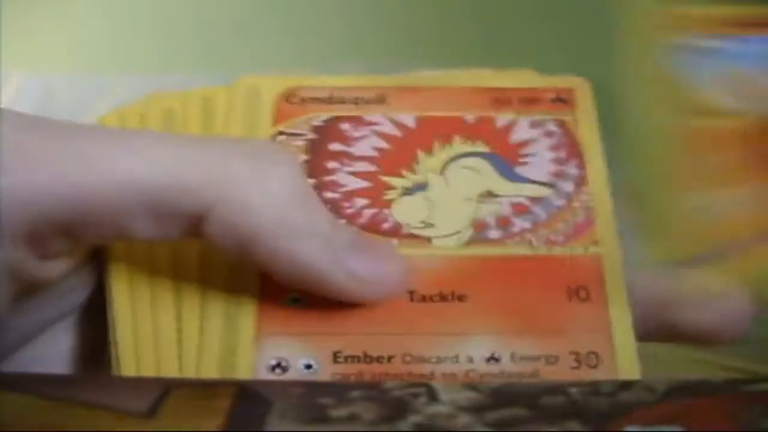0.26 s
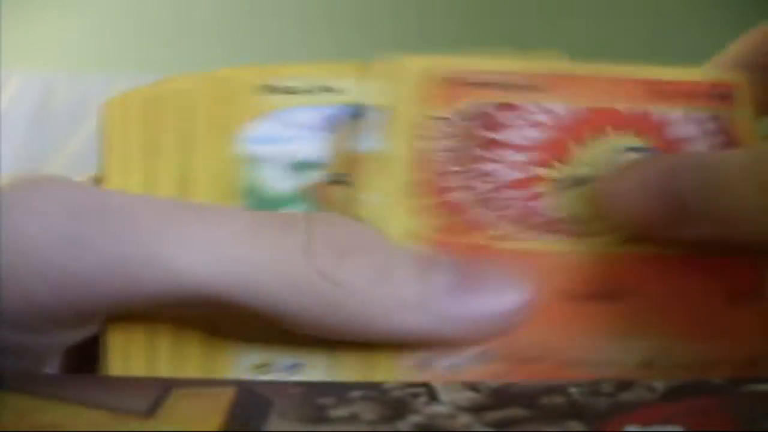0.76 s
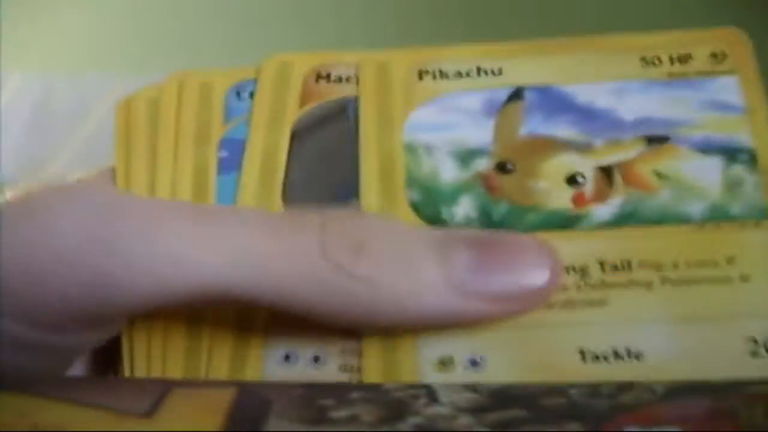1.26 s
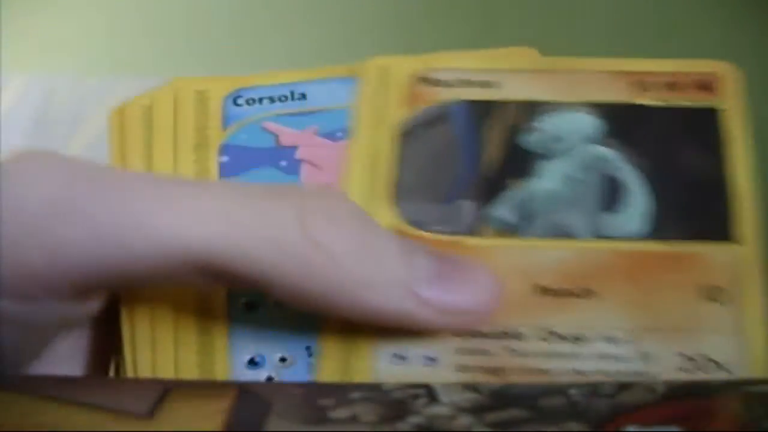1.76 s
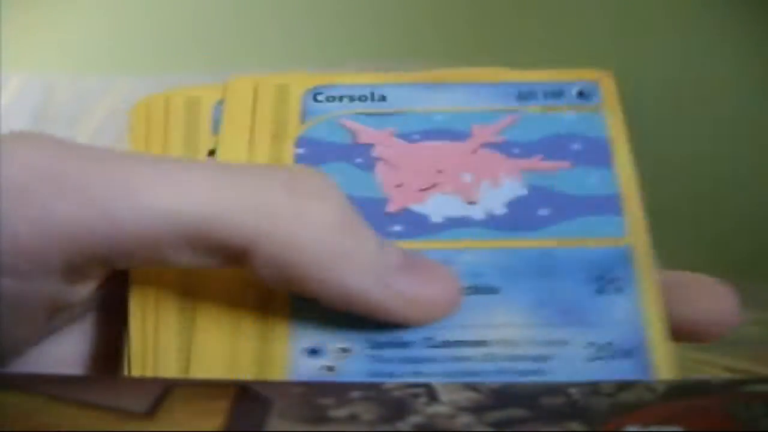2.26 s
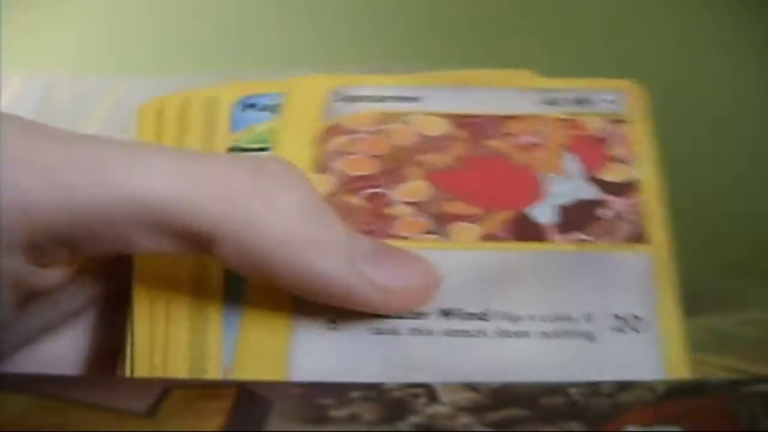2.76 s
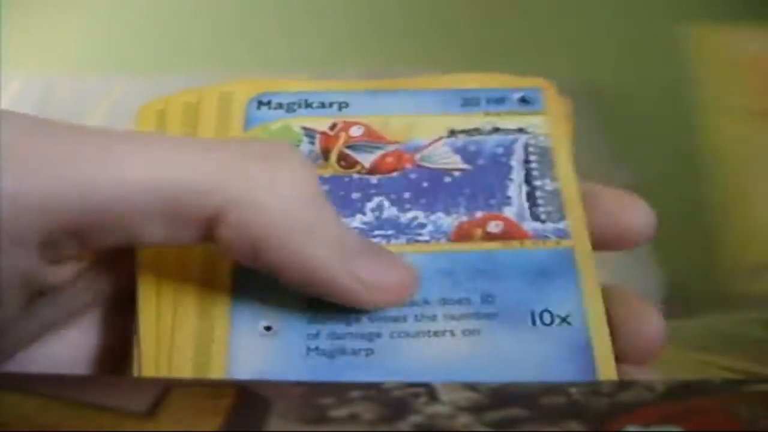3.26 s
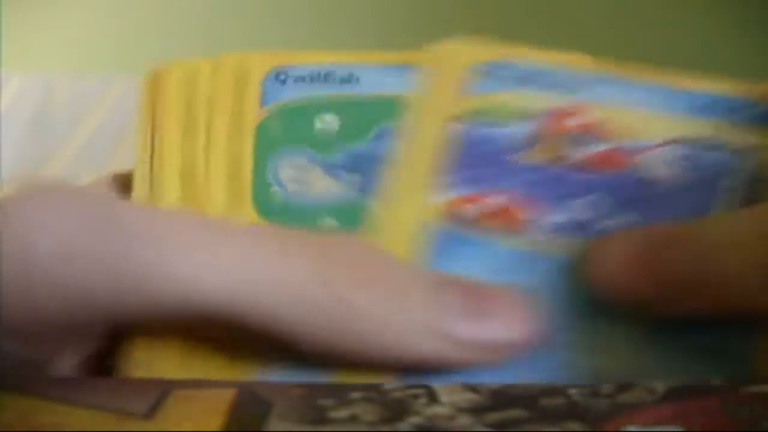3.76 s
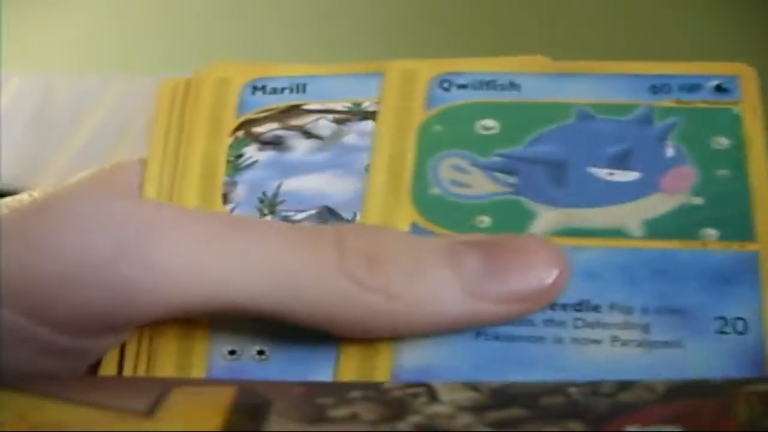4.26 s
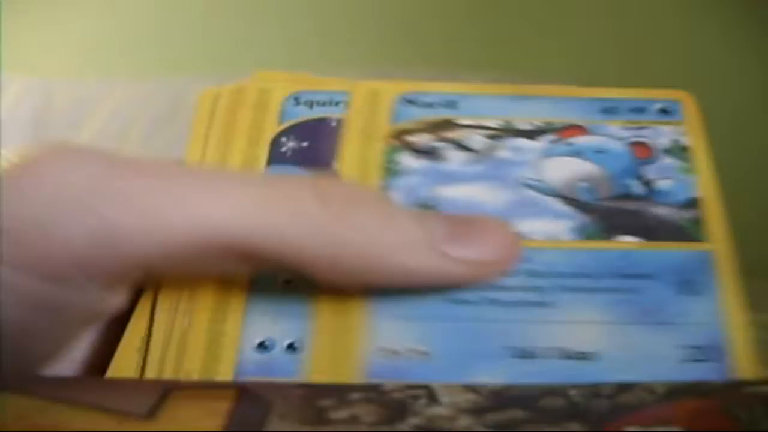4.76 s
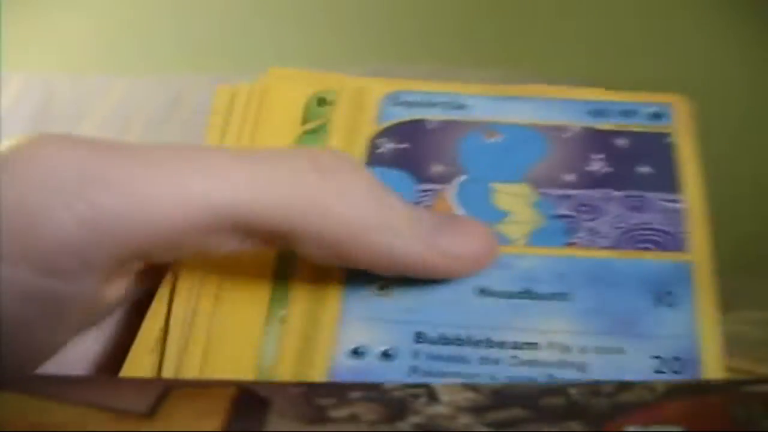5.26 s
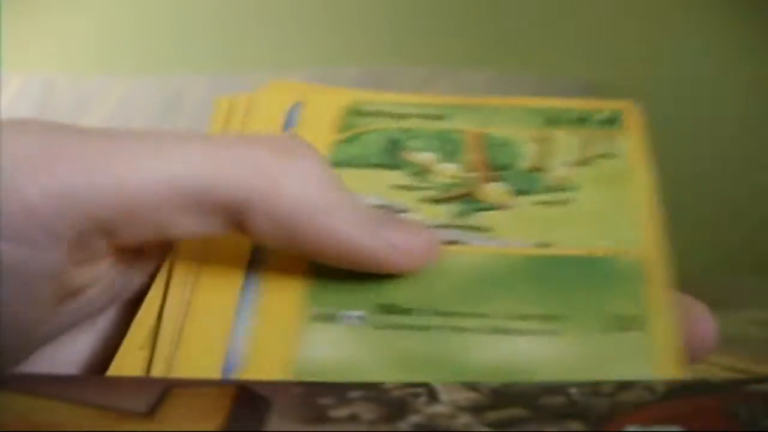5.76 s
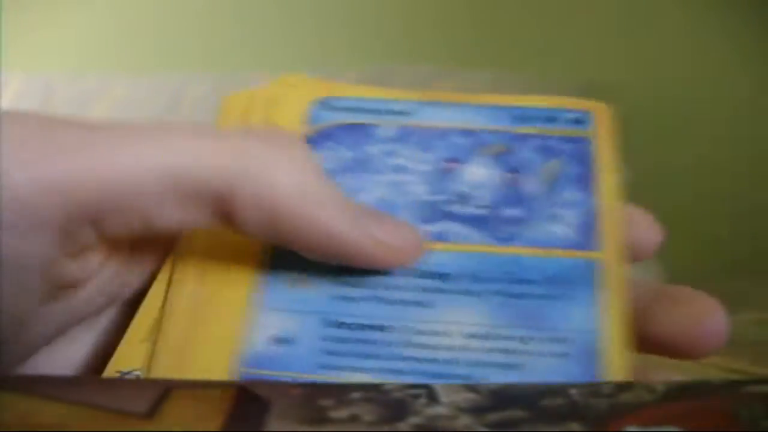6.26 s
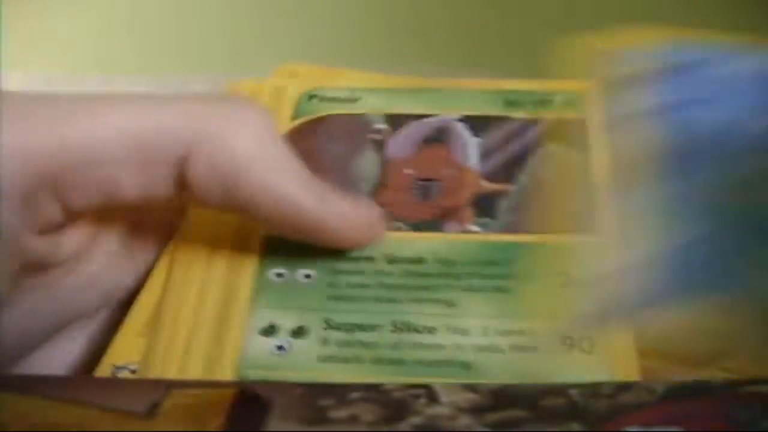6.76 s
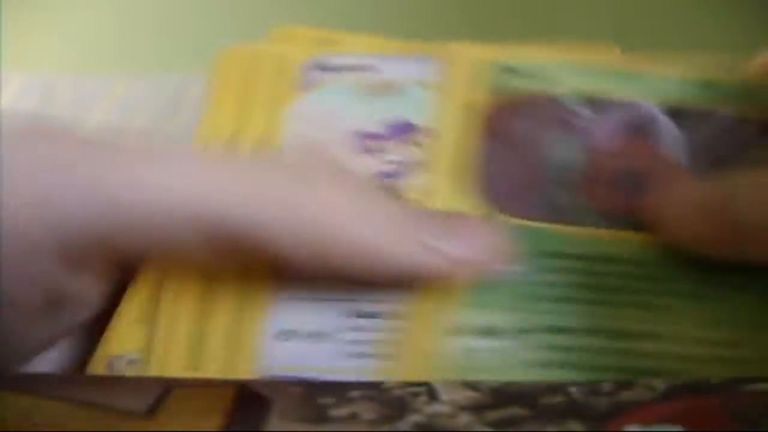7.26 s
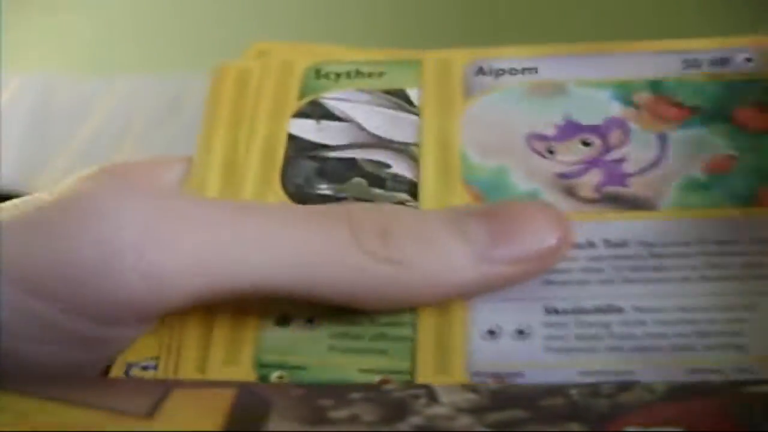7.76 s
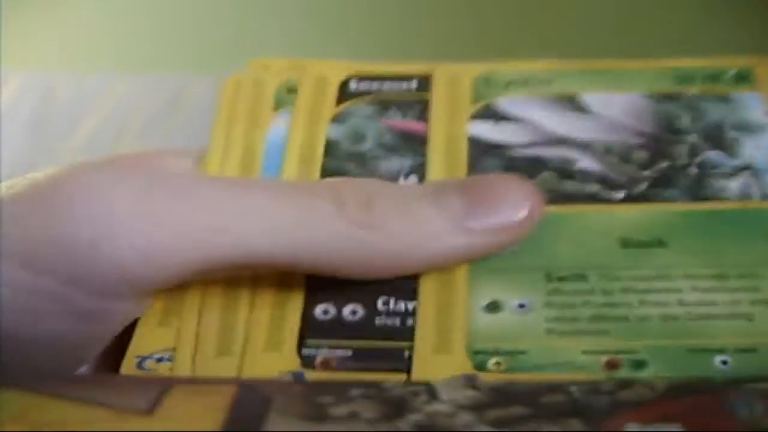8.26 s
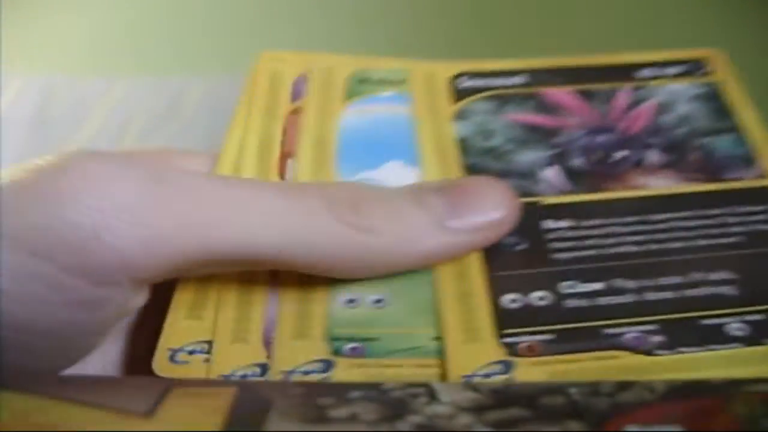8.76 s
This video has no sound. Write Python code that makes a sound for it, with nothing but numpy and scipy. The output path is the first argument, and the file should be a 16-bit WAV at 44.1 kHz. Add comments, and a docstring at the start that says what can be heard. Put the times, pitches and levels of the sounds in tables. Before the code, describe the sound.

A constant soft hiss with a faint, fast electrical throb starts at once and stays beneath everything. From about 0.2 s a stack of stiff coated cards is leafed through by hand, close to a small microphone in a quiet small room. Roughly every 0.6 s the same cycle repeats: a light finger tick, a papery swish gathering speed, a crisp flick as the edge comes free about 0.1 s later, then a snap and short dry scrape as the card slides behind the stack. Small stutters, snags and soft hollow brushes vary each one. Early cards are fairly light; around 3.9-4.1 s a cluster of snags ends in the hardest clack, with a brief ring of the stack. Another firm knock follows at 4.7 s and a strong one at 5.3 s. Lighter flips continue from 5.6 s, with a double tuck near 8.6 s and a last grip and pull beginning around 9 s.

```python
"""A steady hiss with a faint electrical throb opens the scene; then a stack of cards is leafed through by hand,
close to a small camera in a quiet room. Each card ticks when gripped, swishes as it is drawn off, flicks free
and is tucked in behind the stack with a snap and a scrape. Friction is noise with a moving level, snaps are
impulses with a short ring, brushes are resonant noise swells and knocks are sums of decaying modes.
Filtered noise makes the hiss, and a train of small voltage dips makes the throb."""
import sys
import numpy as np
from scipy import signal
from scipy.fft import rfft, irfft
from scipy.io import wavfile

SR = 44100
rng = np.random.default_rng(int(sys.argv[2]) if len(sys.argv) > 2 else 0)


def inscribe(sig):
    """Save sig as 16-bit PCM at rate SR to the path in sys.argv[1].

    A 1-D sig is mono; a 2-D sig holds one channel per row.
    Samples are clipped to [-1, 1] before scaling.
    """
    pcm = np.round(np.clip(np.atleast_2d(sig).T, -1, 1) * 32767)
    wavfile.write(sys.argv[1], SR, pcm.astype(np.int16))


N = 397341  # length [samples]

# Card levels in the tables and settings apply before the layer gains in scene() and the shared resonances.

# Spectrum of the microphone's hiss: (frequency [Hz], relative density [dB])
HISS_SPECTRUM = [(20, 9), (120, 5), (300, 0.5), (750, 1.5), (1500, -0.5), (3800, 0.5), (5500, -2),
                 (7000, -4), (8500, -9.5), (9700, -17), (11000, -37)]
# Resonances of the cavity before the microphone: (frequency [Hz], width [Hz], lift [dB])
CAVITY_RESONANCES = [(2425, 31, 4.5), (8530, 143, 8.5)]
# Spectrum of coated-card friction: (frequency [Hz], relative density [dB])
FRICTION_SPECTRUM = [(900, -54), (1750, -9.5), (2300, 1.5), (3400, 2), (4600, 0), (6000, -2.5),
                     (7500, -3.5), (8600, -11.5), (9400, -16), (11000, -35)]
# Spectrum of a card edge cracking: (frequency [Hz], relative density [dB])
CRACK_SPECTRUM = [(60, -63), (300, -17.5), (1100, -26.5), (1700, -6), (2400, 2), (3500, 2), (4500, 3.5),
                  (6000, 0.5), (7500, -4), (8600, -12), (9400, -8.5), (11000, -25.5)]
# Broad response of a card held in the fingers: (frequency [Hz], relative density [dB])
BODY_SPECTRUM = [(40, -45), (150, -7.5), (350, -4), (700, -0.5), (1000, -0.5), (1600, -8.5), (2200, -13),
                 (4000, -38.5)]
# A card brushes along the fingers:
# (loudest time [s], friction hiss [dB], ring [dB], resonance [Hz], half length of ring swell [s])
BRUSHES = [(0.352, -54, -53.5, 1520, 0.0063), (0.964, -52, -53.5, 1120, 0.0044),
           (1.503, -60, -43, 780, 0.0024), (2.213, -53.5, -44.5, 1060, 0.0032),
           (3.374, -62, -68, 1200, 0.004), (4.002, -51.5, -60, 1420, 0.012),
           (4.612, -47, -47, 1190, 0.0031), (5.187, -55.5, -58.5, 890, 0.014),
           (6.341, -60.5, -55, 865, 0.003), (6.838, -50.5, -53.5, 816, 0.0033),
           (7.454, -65, -67, 1040, 0.008), (8.536, -67, -52, 2080, 0.0024), (8.636, -51, -41, 684, 0.0037),
           (8.898, -62.5, -69, 430, 0.013)]
# A card knocks hard against the stack: (time [s], level over 1 ms [dB])
KNOCKS = [(3.898, -33), (4.091, -21.5), (4.100, -26), (4.675, -33), (5.270, -21), (5.281, -23),
          (8.669, -34)]
# Ring of the stack in the cupped hand: (frequency [Hz], relative level [dB], 60 dB decay time [s])
STACK_MODES = [(384, -32, 0.19), (700, -19, 0.04), (904, -5, 0.03), (2507, 4.5, 0.028), (2830, -6, 0.058),
               (3420, -6, 0.061), (8170, -5.5, 0.034)]
# A finger lands on the top card: (time [s], edge crack over 1 ms [dB], card flex over 1 ms [dB])
GRIPS = [(0.172, -41.5, -47), (0.757, -35.5, -36), (1.373, -50, -46.5), (1.995, -53, -47.5),
         (2.550, -46, -41.5), (3.149, -48, -40.5), (3.736, -35.5, -42), (4.389, -48.5, -42),
         (4.984, -42.5, -45.5), (5.576, -48, -47), (6.091, -57, -53.5), (6.682, -50, -49.5),
         (7.256, -40.5, -46), (7.835, -43.5, -41), (8.415, -47.5, -47), (8.963, -46, -53)]
# A card comes unstuck and gathers speed: (start time [s], swell length [s], unstick crack over 1 ms [dB],
# swish at start [dB], swish at fastest [dB], card resonance [Hz])
PULLS = [(0.181, 0.06, -51, -58, -54.5, 1220), (0.776, 0.097, -42.5, -60, -47.5, 990),
         (1.403, 0.067, -45, -72, -49, 836), (2.014, 0.068, -46.5, -66, -50, 1150),
         (2.580, 0.100, -42.5, -61, -48.5, 1080), (3.154, 0.064, -43.5, -70.5, -51.5, 810),
         (3.749, 0.12, -38.5, -64.5, -50.5, 795), (4.398, 0.096, -51, -65, -51.5, 700),
         (4.995, 0.099, -45, -57, -48, 940), (5.595, 0.086, -47, -64, -55.5, 810),
         (6.112, 0.089, -41, -65, -52, 810), (6.698, 0.090, -46.5, -64, -48.5, 1060),
         (7.263, 0.088, -41.5, -60.5, -49, 895), (7.856, 0.096, -40, -61, -50, 705),
         (8.431, 0.084, -65, -64, -47.5, 755), (8.969, 0.045, -55, -68, -54.5, 980)]
# The far edge flicks free of the thumb:
# (time [s], edge crack over 1 ms [dB], card flex over 1 ms [dB], flex frequency [Hz])
FLICKS = [(0.267, -30.5, -43.5, 1240), (0.870, -37.5, -34.5, 1040), (1.502, -43.5, -34, 810),
          (2.105, -48, -46, 970), (2.685, -48, -43.5, 1060), (3.234, -46, -43, 810),
          (3.879, -33.5, -34.5, 825), (4.492, -40.5, -36, 640), (5.103, -30, -40.5, 1550),
          (5.683, -40, -34.5, 540), (6.227, -39, -36, 890), (6.807, -42, -43, 1280),
          (7.353, -39.5, -38, 580), (7.939, -37, -50, 840), (8.526, -37, -49, 1640)]
# A card snags on a neighbour's edge and slips free:
# (time [s], edge crack over 1 ms [dB], card flex over 1 ms [dB], flex frequency [Hz])
SNAGS = [(0.445, -32.5, -40, 1570), (1.047, -44, -33, 860), (1.067, -39.5, -39, 740),
         (2.088, -46, -44, 1110), (2.26, -42, -42, 840), (2.834, -58, -34.5, 960),
         (3.25, -40.5, -48.5, 1560), (3.416, -38, -35.5, 1450), (3.439, -38, -36, 1010),
         (3.858, -39.5, -51, 830), (3.887, -29, -36.5, 1410), (3.898, -28.5, -43, 850),
         (4.054, -39.5, -34, 1190), (4.065, -43, -46, 810), (4.091, -29, -27, 830), (4.1, -25.5, -45, 417),
         (4.119, -35, -35, 825), (4.676, -46, -31.5, 1590), (4.684, -33, -34, 970),
         (5.094, -38.5, -47.5, 960), (5.271, -24, -23, 700), (5.28, -35, -33.5, 1540),
         (5.698, -40.5, -45.5, 820), (5.818, -41.5, -40, 785), (5.854, -46, -48, 745),
         (6.207, -57, -41, 710), (6.401, -44, -42.5, 640), (7.534, -43, -35, 740), (8.094, -35, -33, 1580),
         (8.622, -37, -43, 1250), (8.681, -41, -40.5, 1610)]
# A card meets the back of the stack and scrapes home: (contact time [s], swell length [s],
# crack over 1 ms [dB], flex over 1 ms [dB], scrape at fastest [dB], 60 dB fade time [s],
# card body against hiss [dB], card resonance [Hz])
TUCKS = [(0.438, 0.018, -39.5, -42.5, -47.5, 0.16, -6.5, 865),
         (1.039, 0.033, -39, -36.5, -48.5, 0.14, -6, 790), (1.668, 0.018, -37, -34.5, -48.5, 0.17, -8, 600),
         (2.243, 0.034, -43, -65, -51, 0.16, -7.5, 885), (2.828, 0.013, -40, -38, -51.5, 0.15, -8, 1490),
         (3.402, 0.034, -36, -62, -51, 0.25, -5.5, 865), (4.087, 0.017, -24, -28, -33, 0.15, -15, 690),
         (4.672, 0.022, -36, -38, -43, 0.14, -12, 700), (5.225, 0.04, -35.5, -36.5, -45, 0.22, -6.5, 1220),
         (5.268, 0.003, -30, -26, -32, 0.16, -9, 517), (5.806, 0.021, -37, -43, -51, 0.18, -8.5, 765),
         (6.36, 0.044, -39.5, -39, -53.5, 0.2, -7.5, 950),
         (6.943, 0.024, -42, -38.5, -48.5, 0.14, -7, 1600), (7.524, 0.026, -58, -55, -45.5, 0.17, -10, 785),
         (8.075, 0.027, -37, -35.5, -43, 0.16, -8.5, 1090), (8.604, 0.03, -43, -44, -47, 0.12, -4, 724),
         (8.668, 0.011, -33.5, -35.5, -45.5, 0.16, -19, 600)]

# Background; the throb's width is the 1/e half-width of one dip
HISS_DB = -66.5
FRAME_HZ = 30
THROB_DB, THROB_WIDTH_S, THROB_DELAY_S = -63, 0.0022, 0.00072
ROOM_T60_S, ROOM_DB = 0.13, -16.5
CUTOFF_HZ = 10900
# Friction strokes: swell rise, fade and body level against hiss
PULL_FADE_T60_S, PULL_BODY_DB = 0.14, -15.5
TUCK_SWELL_DB = 10
BRUSH_SWELL_S, BRUSH_SWELL_DB, BRUSH_FADE_T60_S, BRUSH_BODY_DB = 0.031, 18.5, 0.11, -13
# Just before it meets the stack a card slides over the fingers; level is against its scrape
APPROACH_S, APPROACH_DB, APPROACH_SWELL_DB, APPROACH_FADE_T60_S = 0.016, -17.5, 7.5, 0.045
# Edge snaps; the unstick flex is against its crack
GRIP_FLEX_HZ, GRIP_FLEX_T60_S, UNSTICK_FLEX_DB = 650, 0.015, -4
FLICK_FLEX_T60_S, SNAG_FLEX_T60_S, TUCK_FLEX_T60_S = 0.02, 0.016, 0.028
# A sliding edge stutters at chance moments; cracks are against the friction hiss, flex against the crack
STUTTERS_PER_PULL, STUTTERS_PER_TUCK = 4, 2
PULL_STUTTER_DB, TUCK_STUTTER_DB, STUTTER_FLEX_DB, STUTTER_SPREAD_DB = 2.5, 1.5, -4.5, 3.5
STUTTER_FLEX_T60_S, STUTTER_SPREAD_OCTAVES, STUTTER_OVERRUN_S = 0.014, 0.28, 0.014


def from_db(db):
    """Logarithmic level: 20 dB is a factor of ten in amplitude."""
    return 10 ** (np.asarray(db) / 20)


def rms_one(x):
    """Mean power: scale a sound to rms 1."""
    return x / np.sqrt(np.mean(x ** 2) + 1e-20)


def unit_pulse(x):
    """Pulse energy: scale to that of one millisecond at rms 1."""
    return x * np.sqrt(SR / 1000 / (np.sum(x ** 2) + 1e-20))


def colour(x, spectrum, ripple_db=0.0, size=2048):
    """Minimum-phase filtering: a causal spectrum; ripple adds chance resonances, as each grip bends a card."""
    hz = np.maximum(np.arange(size // 2 + 1) * SR / size, 1)
    points, levels = np.transpose(spectrum)
    bump_places = np.linspace(0, np.sqrt(hz[-1]), num=75)
    bumps = np.interp(np.sqrt(hz), bump_places, rng.standard_normal(size=75))
    response_db = np.interp(np.log(hz), np.log(points), levels) + ripple_db * bumps
    # folding the cepstrum onto positive time makes the filter causal
    cepstrum = irfft(np.log(from_db(response_db)))
    cepstrum[1:size // 2] *= 2
    cepstrum[size // 2 + 1:] = 0
    impulse_response = irfft(np.exp(rfft(cepstrum)))
    return signal.fftconvolve(x, impulse_response)[:len(x)]


def resonate(x, hz, width_hz):
    """Simple resonance: a damped pole pair with gain 1 at its peak."""
    r = np.exp(-np.pi * width_hz / SR)
    feedforward = np.array([1, 0, -1]) * (1 - r * r) / 2
    feedback = [1, -2 * r * np.cos(2 * np.pi * hz / SR), r * r]
    return signal.lfilter(feedforward, feedback, x)


def add(out, s, sound):
    """Superposition: mix a sound in at a time in seconds."""
    at = max(round(s * SR), 0)
    out[at:at + len(sound)] += sound[:max(N - at, 0)]


def grains(count, per_s, spread_db):
    """Stick-slip of paper fibres: random clicks of uneven size, scaled to rms 1."""
    sizes = from_db(spread_db * np.minimum(rng.exponential(1, count), 3.5))
    occurs = rng.random(count) < per_s / SR
    return rms_one(occurs * sizes * rng.choice([-1, 1], count))


def camera_noise(uneven_db=3.0):
    """Electrical noise: microphone hiss, and a small dip of the supply at each frame readout."""
    frames = (np.arange(N) / SR - THROB_DELAY_S) * FRAME_HZ + .5
    frame_depths = from_db(THROB_DB + uneven_db * rng.standard_normal(int(frames[-1]) + 2))
    depth = frame_depths[frames.astype(int)]
    from_centre_s = (frames % 1 - .5) / FRAME_HZ
    dips = depth * np.exp(-(from_centre_s / THROB_WIDTH_S) ** 2)
    hiss = from_db(HISS_DB) * rms_one(colour(rng.standard_normal(N), HISS_SPECTRUM))
    return hiss + dips.mean() - dips


def room(x, first_echo_s=0.0013, wall_cut_hz=7000, size=16384):
    """Reverberation: a small furnished room returns a short, slightly dull, exponentially decaying tail."""
    t = np.arange(size) / SR
    decay = np.exp(-np.log(1000) * t / ROOM_T60_S)
    tail = rng.standard_normal(size) * decay * (t > first_echo_s)
    tail = signal.sosfilt(signal.butter(1, wall_cut_hz, fs=SR, output="sos"), tail)
    return signal.fftconvolve(x, tail / np.sqrt(np.sum(tail ** 2)))[:N]


def knocks(spread_db=0.5, size=6000):
    """Modal superposition: a hard knock rings the whole stack, each mode with a strength of its own."""
    out, t = np.zeros(N), np.arange(size) / SR
    hz, mode_db, t60 = np.transpose(STACK_MODES)[:, :, None]
    for s, level_db in KNOCKS:
        strength = from_db(mode_db + spread_db * rng.standard_normal(hz.shape))
        strength = strength * rng.choice([-1, 1], hz.shape)
        modes = strength * np.sin(2 * np.pi * hz * t) * np.exp(-np.log(1000) * t / t60)
        add(out, s, from_db(level_db) * unit_pulse(modes.sum(axis=0)))
    return out


def brushes(width_hz=450, size=4096):
    """Resonant noise: a soft graze has no crack; it swells and fades in one resonance of the card."""
    out, t = np.zeros(N), (np.arange(size) - size // 2) / SR
    for s, _, level_db, hz, half_length in BRUSHES:
        swell = 1 / (1 + (t / half_length) ** 2)
        rub = resonate(rng.standard_normal(size), hz, width_hz)
        rub = swell * resonate(rub, hz, width_hz)
        add(out, s + t[0], from_db(level_db) * rms_one(rub) * np.sqrt(np.mean(swell ** 2)))
    return out


def strokes():
    """Kinematics of sliding: pulls, tucks and light grazes, each stroke rising to its fastest moment."""
    # rows: (start [s], fastest [s], hiss at start [dB], at fastest [dB], fade t60 [s], body [dB], resonance [Hz])
    pulls, tucks, grazes = [], [], []
    for s, swell, _, start_db, top_db, hz in PULLS:
        pulls.append((s, s + swell, start_db, top_db, PULL_FADE_T60_S, PULL_BODY_DB, hz))
    for s, swell, _, _, top_db, fade, body_db, hz in TUCKS:
        tucks.append((s, s + swell, top_db - TUCK_SWELL_DB, top_db, fade, body_db, hz))
        near_db = top_db + APPROACH_DB
        start_db = near_db - APPROACH_SWELL_DB
        grazes.append((s - APPROACH_S, s, start_db, near_db, APPROACH_FADE_T60_S, body_db, hz))
    for s, top_db, _, hz, _ in BRUSHES:
        start_db = top_db - BRUSH_SWELL_DB
        grazes.append((s - BRUSH_SWELL_S, s, start_db, top_db, BRUSH_FADE_T60_S, BRUSH_BODY_DB, hz))
    return pulls, tucks, grazes


def stutters(moves, above_db, count):
    """Stick-slip: small snaps scattered along each stroke follow the strength of its friction."""
    rows = []
    for start, fastest, start_db, top_db, fade, _, card_hz in moves:
        span = fastest + STUTTER_OVERRUN_S - start
        times = start + span * (np.arange(count) + rng.random(count)) / count
        friction_db = np.interp(times, [start, fastest, fastest + fade], [start_db, top_db, top_db - 60])
        levels = friction_db + above_db + STUTTER_SPREAD_DB * rng.standard_normal(count)
        pitches = card_hz * 2 ** (STUTTER_SPREAD_OCTAVES * rng.standard_normal(count))
        for s, db, hz in zip(times, levels, pitches):
            rows.append((s, db, db + STUTTER_FLEX_DB, hz, STUTTER_FLEX_T60_S))
    return rows


def edge_snaps():
    """Elastic release: a card ticks when gripped, comes unstuck, flicks free, may snag, and meets the stack."""
    # rows: (time [s], crack [dB], flex [dB], flex frequency [Hz], flex t60 [s])
    rows = [(*grip, GRIP_FLEX_HZ, GRIP_FLEX_T60_S) for grip in GRIPS]
    for s, _, crack_db, _, _, hz in PULLS:
        rows.append((s, crack_db, crack_db + UNSTICK_FLEX_DB, hz, GRIP_FLEX_T60_S))
    rows += [(*flick, FLICK_FLEX_T60_S) for flick in FLICKS]
    rows += [(*snag, SNAG_FLEX_T60_S) for snag in SNAGS]
    for s, _, crack_db, flex_db, _, _, _, hz in TUCKS:
        rows.append((s, crack_db, flex_db, hz, TUCK_FLEX_T60_S))
    pulls, tucks, _ = strokes()
    rows += stutters(pulls, PULL_STUTTER_DB, count=STUTTERS_PER_PULL)
    return rows + stutters(tucks, TUCK_STUTTER_DB, count=STUTTERS_PER_TUCK)


def snaps(chatter_db=3.5, chatter_s=.0012, creep_s=0.0003, rattle_db=-19.5, rattle_s=0.0041,
          ripple_db=3.0, thud_db=0.0, size=3000):
    """Impulsive excitation: an edge creeps, cracks loose and rattles; the bent card rings for a few cycles."""
    out, lead = np.zeros(N), size // 20
    t = (np.arange(size) - lead) / SR
    after = np.maximum(t, 0)
    release = signal.unit_impulse(size, lead)
    for s, crack_db, flex_db, flex_hz, t60 in edge_snaps():
        chatter_envelope = np.exp(np.minimum(t / creep_s, -t / chatter_s))
        chatter = from_db(chatter_db) * rng.standard_normal(size) * chatter_envelope
        rattle_envelope = np.exp(-after / rattle_s) * (t > 0)
        rattle = from_db(rattle_db) * grains(size, per_s=1000, spread_db=-3.0) * rattle_envelope
        crack = unit_pulse(colour(release + chatter + rattle, CRACK_SPECTRUM, ripple_db))
        # the flex needs a moment to build up, then dies in the grip of the fingers
        settling = (1 - np.exp(-after / creep_s)) * np.exp(-np.log(1000) * after / t60)
        # a free card radiates no bass, hence the derivative
        ring = unit_pulse(np.gradient(np.sin(2 * np.pi * flex_hz * t) * settling))
        thud = unit_pulse(colour(rng.standard_normal(size) * settling, BODY_SPECTRUM, ripple_db))
        flex = unit_pulse(ring + from_db(thud_db) * thud)
        add(out, s + t[0], from_db(flex_db) * flex - from_db(crack_db) * crack)
    return out


def slides(catch_share=0.28, catch_db=1.0, ripple_db=2.0, judder_db=3.0, judder_hz=260, broad_db=7.0):
    """Dry friction: hiss swells with speed and fades as a card stops; the same slips shake the card's body."""
    out = np.zeros(N)
    for start, fastest, start_db, top_db, fade, body_db, card_hz in np.vstack(strokes()):
        rise = max(fastest - start, .002)
        t = np.arange(int((rise + fade) * SR)) / SR
        level_db = np.interp(t, [0, rise, rise + fade], [start_db, top_db, top_db - 60])
        # the faces rub smoothly while the edges catch now and then; shares are of power
        rub = rng.standard_normal(SR)
        catches = grains(SR, per_s=450, spread_db=catch_db)
        slips = (np.sqrt(1 - catch_share) * rub + np.sqrt(catch_share) * catches)[:len(t)]
        # the fingers do not pull evenly
        judder = np.interp(t * judder_hz, np.arange(256), rng.standard_normal(size=256))
        slips = slips * from_db(judder_db * judder)
        hiss = rms_one(colour(slips, FRICTION_SPECTRUM, ripple_db))
        body = colour(slips, BODY_SPECTRUM, ripple_db)
        body = rms_one(resonate(body, card_hz, width_hz=320) + from_db(broad_db) * body)
        add(out, start, from_db(level_db) * (hiss + from_db(body_db) * body))
    return out


def scene(slide_db=-0.73, snap_db=-0.36, knock_db=-1.5):
    """Superposition: cards and their room pass the microphone cavity, over the camera's own noise."""
    cards = from_db(slide_db) * slides() + from_db(snap_db) * snaps()
    cards = cards + brushes() + from_db(knock_db) * knocks()
    heard = cards + from_db(ROOM_DB) * room(cards)
    for hz, width_hz, lift_db in CAVITY_RESONANCES:
        heard = heard + (from_db(lift_db) - 1) * resonate(heard, hz, width_hz)
    return (heard + camera_noise())[None]


def record(dry):
    """Band limiting: an elliptic low-pass cuts the top steeply."""
    return signal.sosfilt(signal.ellip(10, .3, 70, CUTOFF_HZ, fs=SR, output="sos"), dry)


dry = scene()
out = record(dry)
inscribe(out)
```